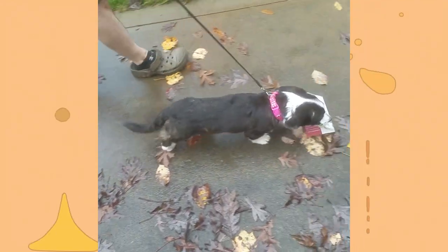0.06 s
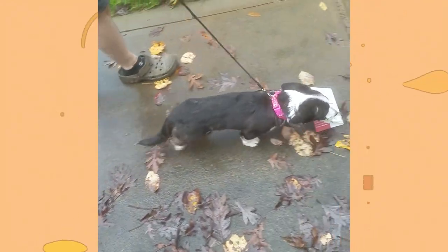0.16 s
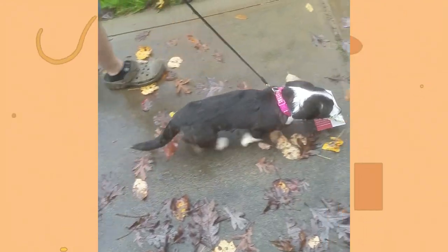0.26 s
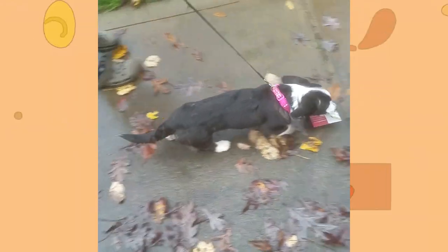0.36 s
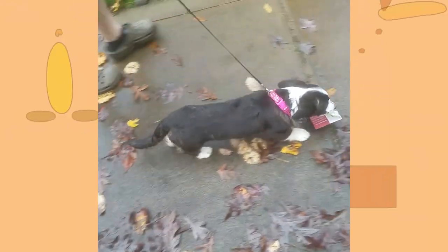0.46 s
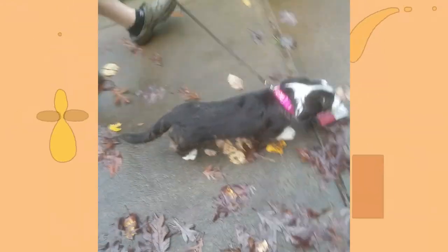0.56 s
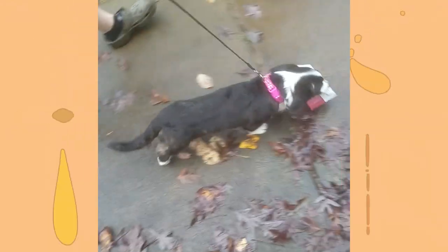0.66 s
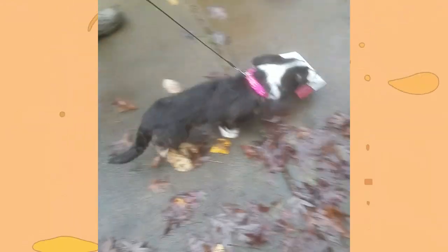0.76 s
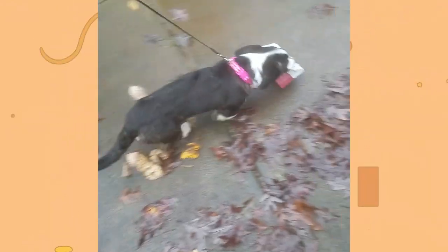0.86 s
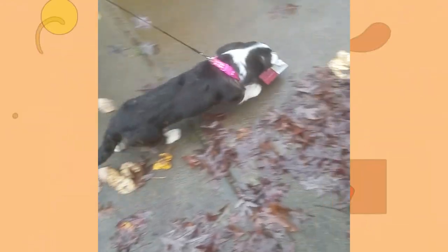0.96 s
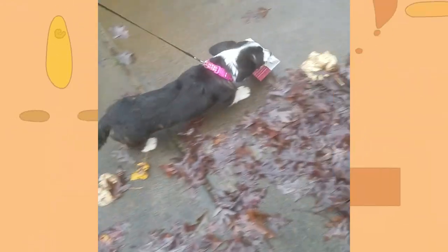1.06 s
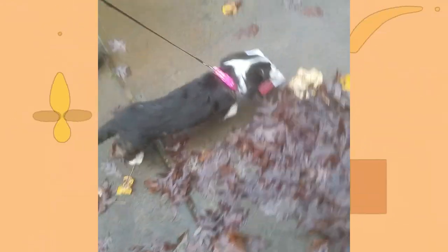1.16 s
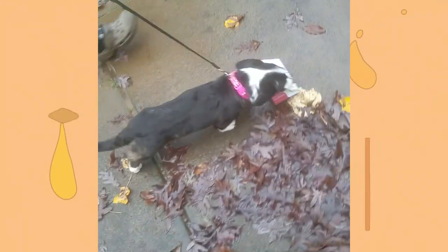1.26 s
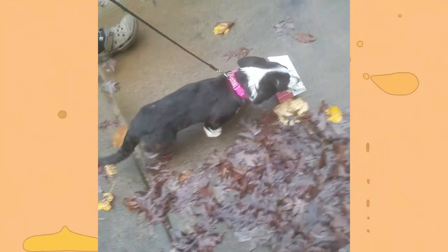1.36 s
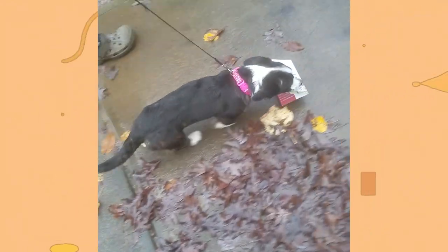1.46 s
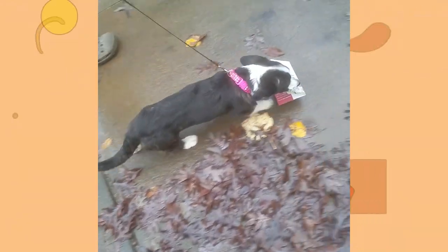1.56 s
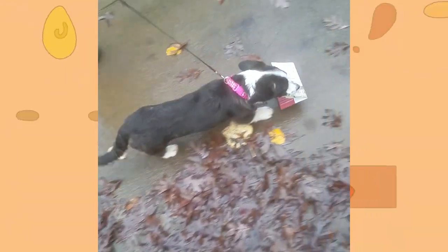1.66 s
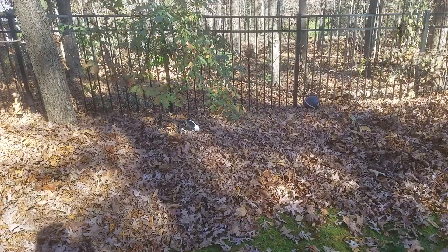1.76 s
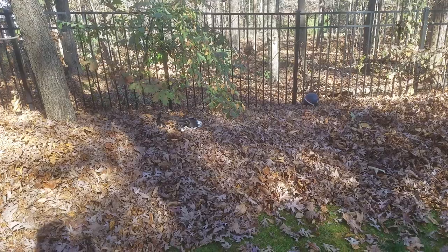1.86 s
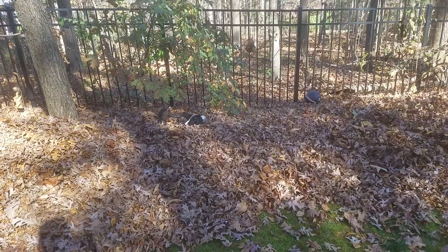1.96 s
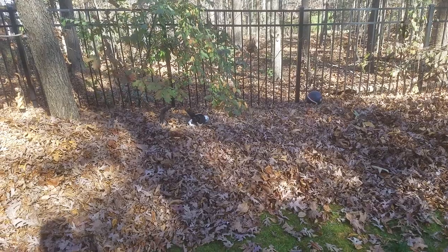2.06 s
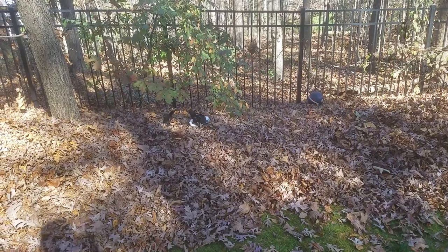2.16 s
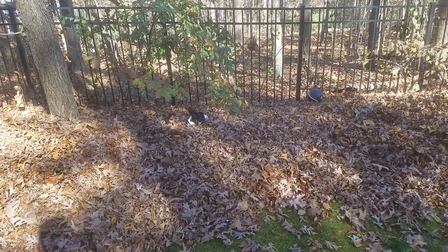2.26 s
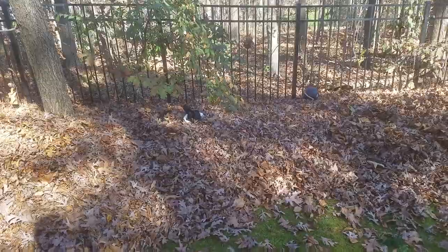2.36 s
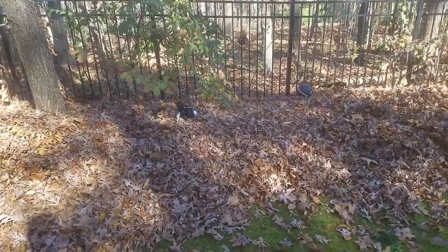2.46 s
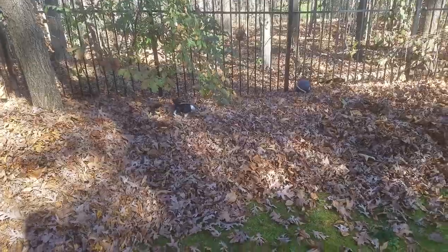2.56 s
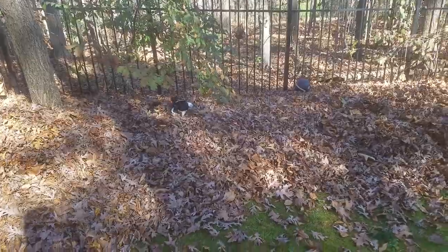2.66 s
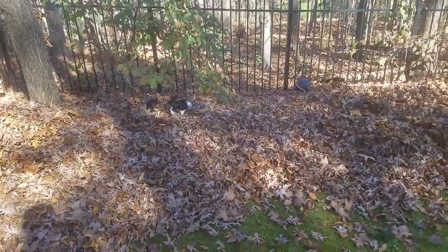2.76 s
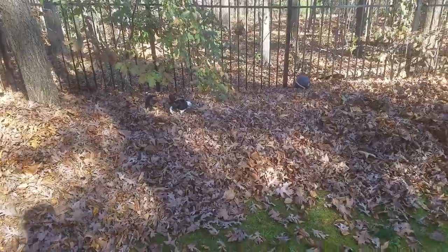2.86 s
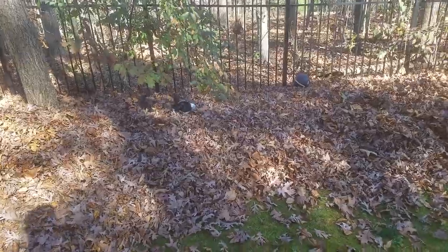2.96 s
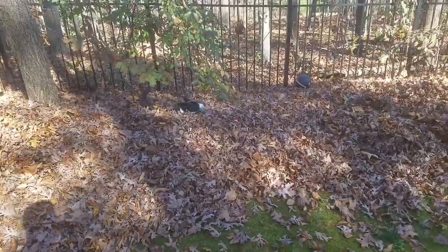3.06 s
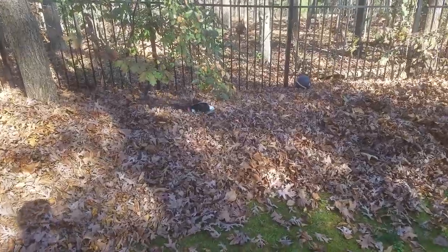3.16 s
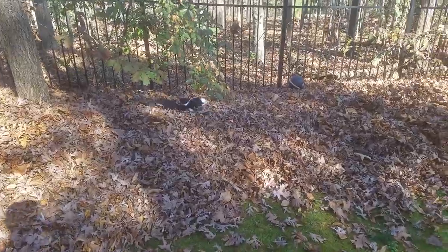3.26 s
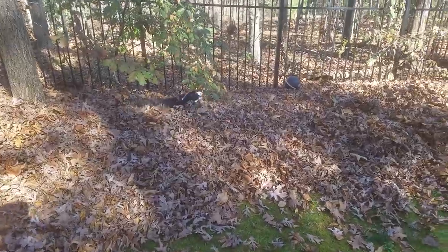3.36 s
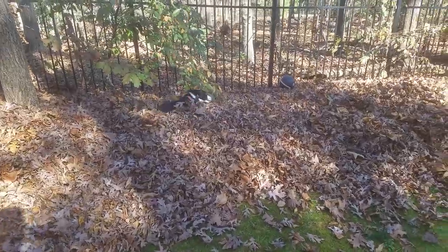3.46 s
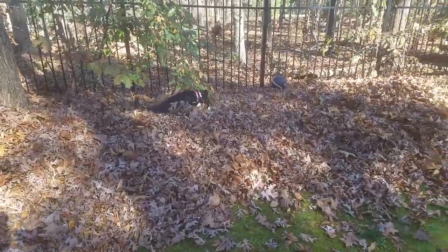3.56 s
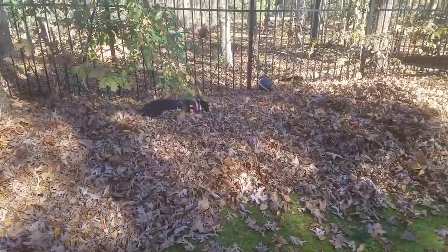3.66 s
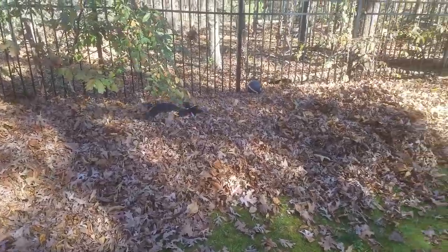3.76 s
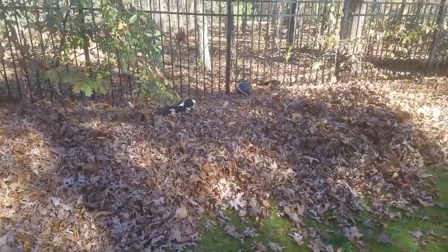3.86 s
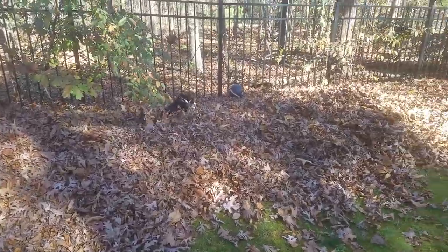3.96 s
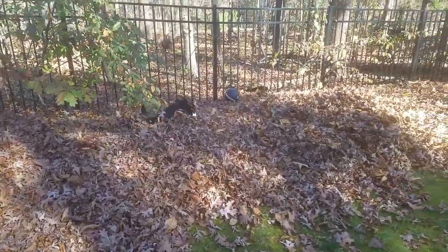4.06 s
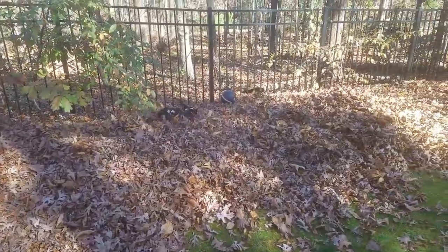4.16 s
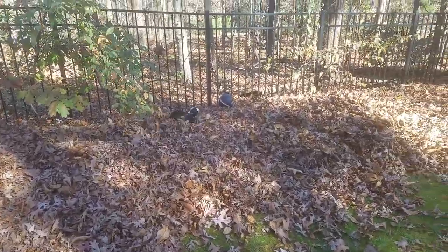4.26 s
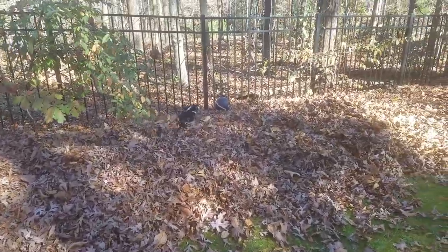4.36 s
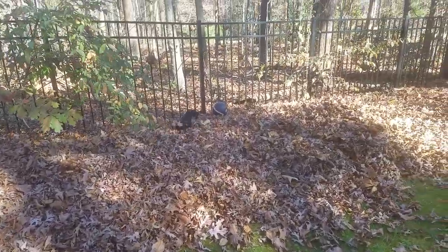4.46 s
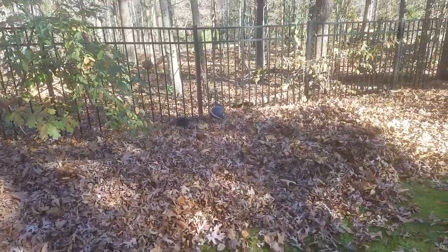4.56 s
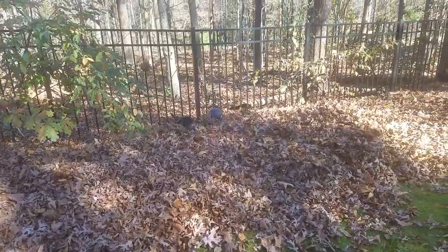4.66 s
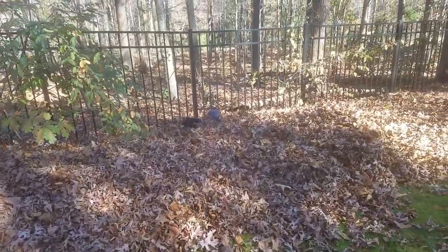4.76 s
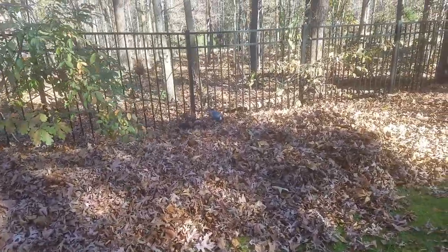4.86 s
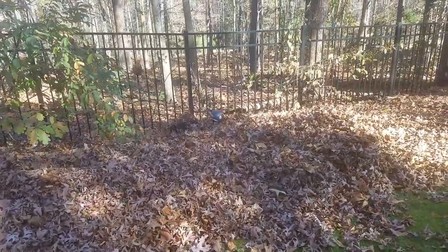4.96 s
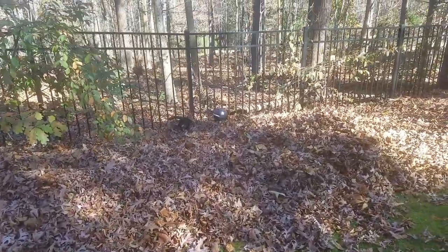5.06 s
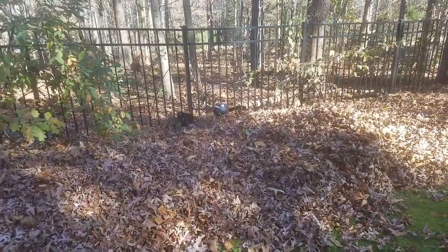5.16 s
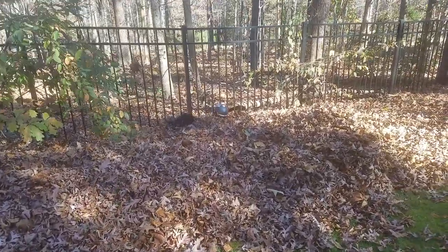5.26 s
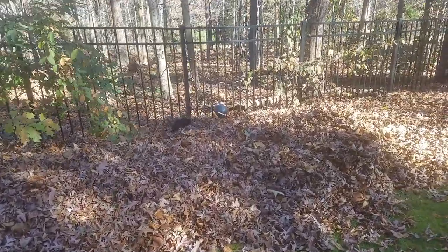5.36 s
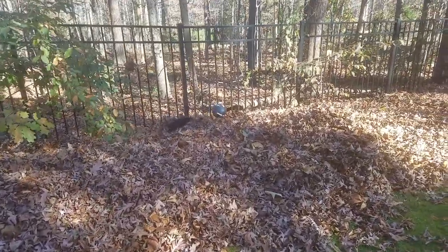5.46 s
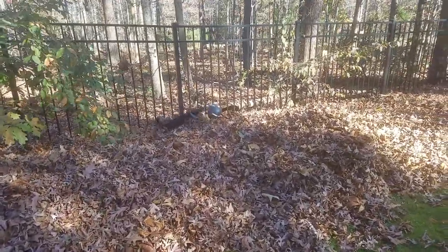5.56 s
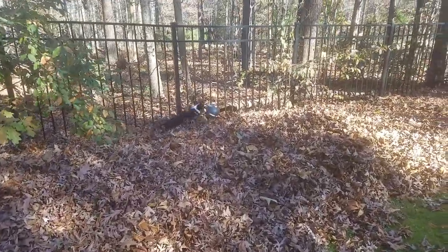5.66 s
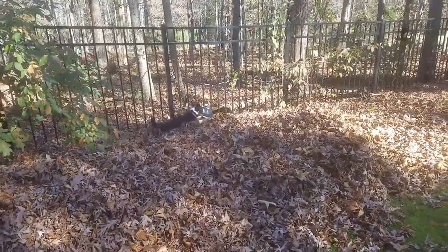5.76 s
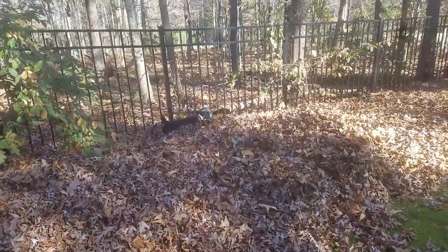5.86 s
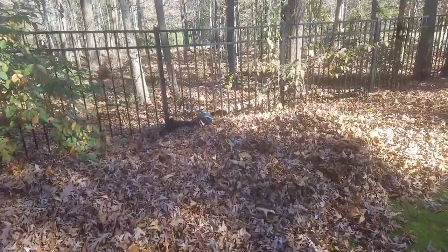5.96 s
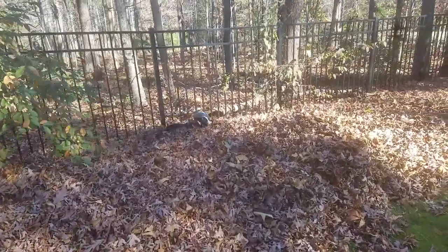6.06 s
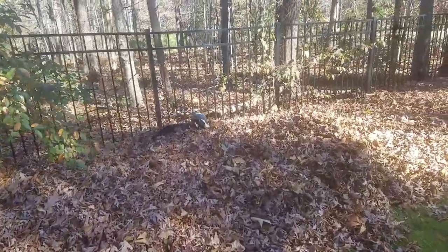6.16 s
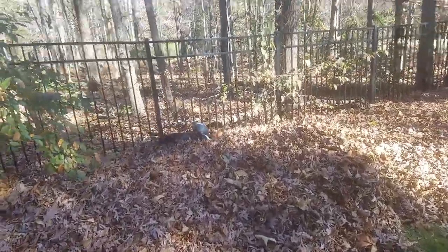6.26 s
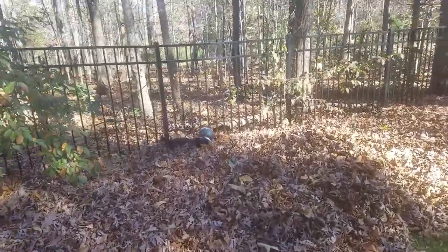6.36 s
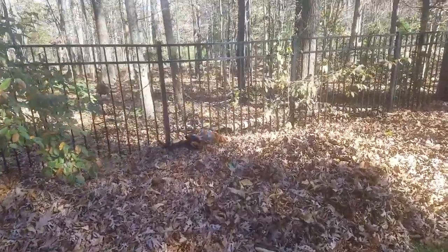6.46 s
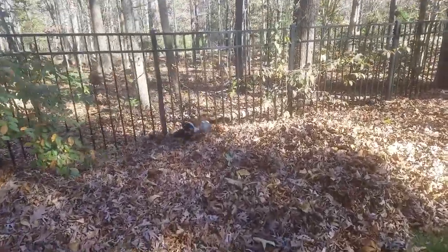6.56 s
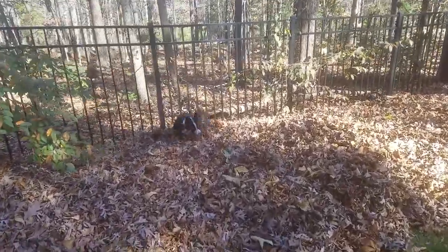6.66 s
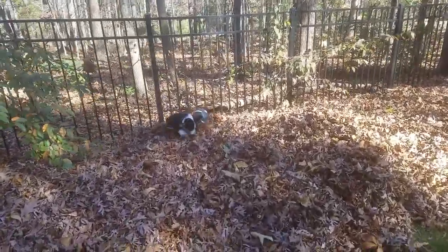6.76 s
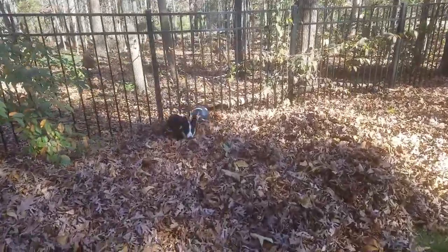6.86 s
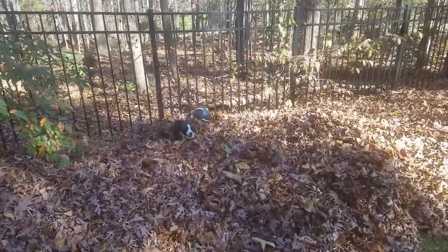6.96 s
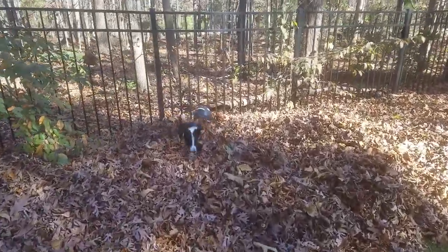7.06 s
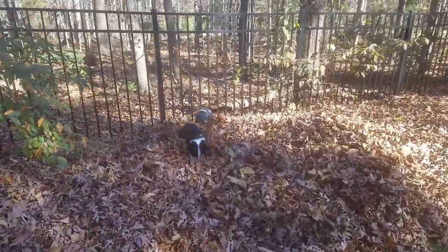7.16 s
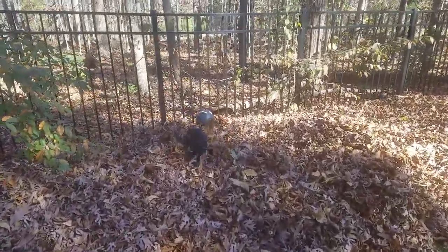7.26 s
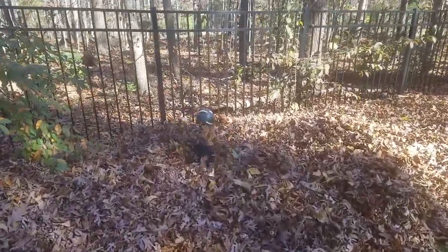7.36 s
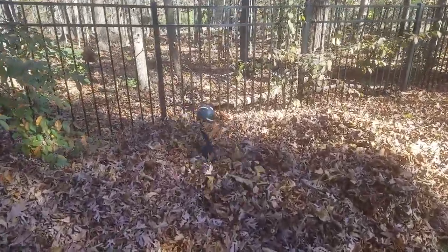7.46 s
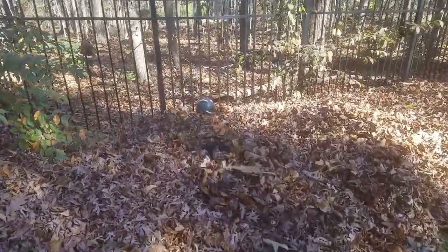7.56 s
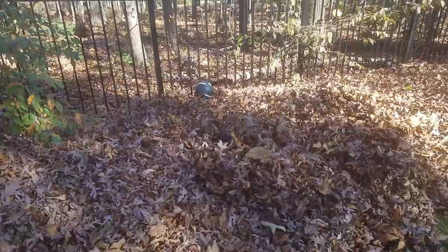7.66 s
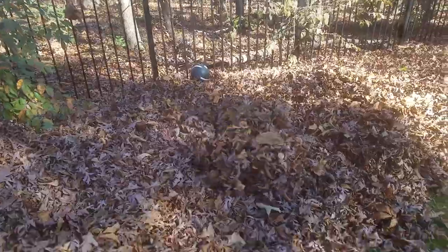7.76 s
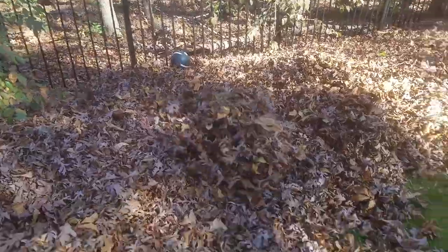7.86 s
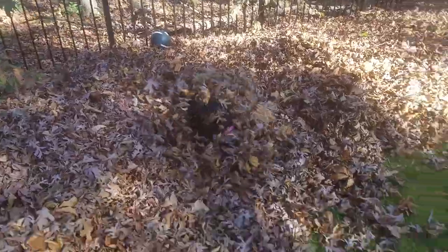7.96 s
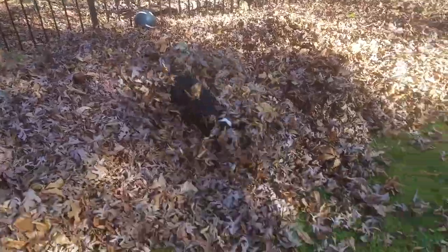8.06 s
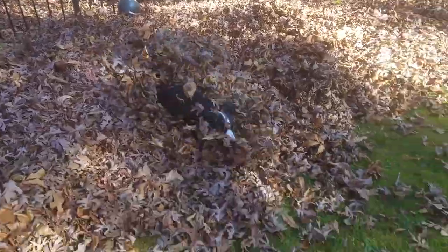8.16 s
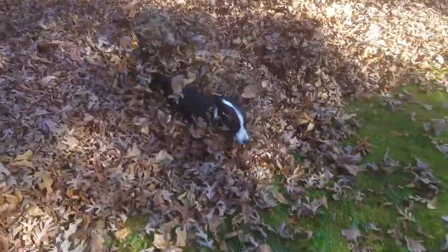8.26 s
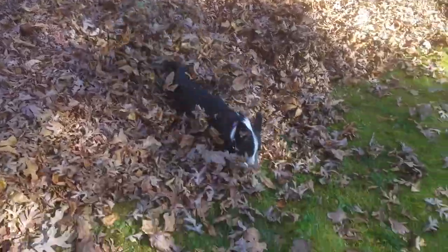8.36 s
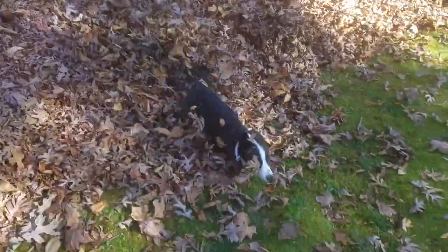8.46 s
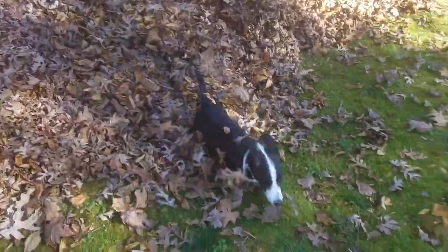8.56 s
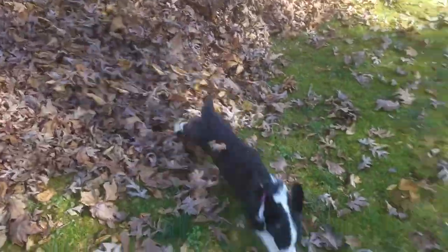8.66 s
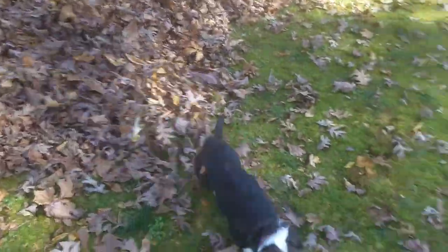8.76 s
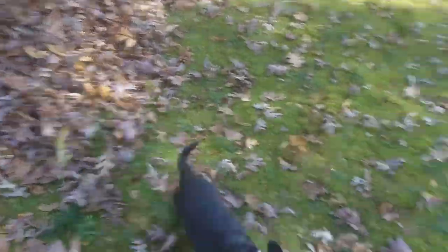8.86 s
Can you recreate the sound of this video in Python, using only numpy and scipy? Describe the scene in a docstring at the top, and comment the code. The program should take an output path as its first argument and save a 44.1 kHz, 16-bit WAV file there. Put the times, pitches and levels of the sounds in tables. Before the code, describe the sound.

A small dog pushes through a heap of dry leaves in a breezy yard, its brittle rustle coming in surges with occasional snaps and knocks of buried sticks. Before this comes a brief, quiet stretch of gritty shoe scuffs and sharp claw ticks on a pavement. The rustling starts some way off, eases briefly, then swells as the dog bounds close to the microphone and lands with dull thuds.

```python
"""Clogs scuff along a wet, leaf-strewn pavement, and grit clicks under the claws of a small dog beside them.
After 1.7 s the scene changes to a breezy yard: the dog ploughs through a deep pile of dry leaves,
then bounds closer, thudding as it lands. The scuffs are friction noise. The rustle is brittle fracture:
thousands of tiny cracks that reach two microphone ports, the left one first."""
import sys
import numpy as np
from scipy import signal
from scipy.fft import rfft, irfft, next_fast_len
from scipy.io import wavfile
from scipy.ndimage import uniform_filter1d, map_coordinates

SR = 44100
rng = np.random.default_rng(int(sys.argv[2]) if len(sys.argv) > 2 else 0)


def to_wav(sig):
    """Store sig (one row per channel, or 1-D mono) as 16-bit WAV at the path in sys.argv[1].

    Samples outside -1..1 are clipped; the rate is SR.
    """
    pcm = np.clip(np.atleast_2d(sig), -1, 1) * 32767
    pcm = np.round(pcm).astype(np.int16)
    wavfile.write(sys.argv[1], SR, pcm.T)  # frames by channels


N = 392931
TIME = np.arange(N) / SR
FFT_SIZE = next_fast_len(N + 8192)
FREQS = np.fft.rfftfreq(FFT_SIZE, 1 / SR)
YARD_START_S, TOP_HZ = 1.745, 16000
STREET_LEAD_MS = 0.24  # pavement sounds reach the right port first


def amp(db):
    """Amplitude ratio of a level in decibels."""
    return 10 ** (np.asarray(db) / 20)


def gain_at(points, hz):
    """Amplitude response from (f/Hz, level/dB) points, interpolated in log frequency."""
    f, db = np.transpose(points)
    return amp(np.interp(np.log(hz + 1), np.log(f + 1), db))


def curves(rows):
    """Linear interpolation in time: one value per sample for each column after the first."""
    times, *columns = np.transpose(rows)
    return [np.interp(TIME, times, column) for column in columns]


def wobble(rate):
    """Random modulation: a spline through rate Gaussian knots a second."""
    knots = rng.standard_normal(int(N * rate / SR) + 4)
    return map_coordinates(knots, [TIME * rate], order=2)


def filtered(x, response):
    """Linear filtering: the spectrum of x times a frequency response."""
    return irfft(rfft(x, FFT_SIZE) * response(FREQS), FFT_SIZE)[..., :N]


def gliding_band(x, centre_hz, width_hz):
    """Heterodyne band-pass: the part of x around a gliding centre frequency."""
    carrier = np.exp(2j * np.pi * np.cumsum(centre_hz) / SR)
    baseband = signal.lfilter(*signal.butter(1, width_hz / 2, fs=SR), x / carrier)
    return 2 * (carrier * baseband).real


def add(track, start, sound):
    """Superposition: a stereo sound joins the track at start seconds."""
    part = track[:, round(start * SR):][:, :sound.shape[-1]]
    part += sound[..., :part.shape[-1]]


# Imbalance of the ports in each place: f/Hz, left minus right level/dB
YARD_PORTS = [(60, -4), (110, -3), (200, -3), (380, -1.5), (700, 0), (1290, -1), (2380, -1.5), (4400, -2.5),
              (8120, 7.5), (15000, 3)]
STREET_PORTS = [(60, 1), (110, -1), (200, 0), (380, -3.5), (700, -2), (1290, -4), (2380, 1), (4400, -1),
                (8120, -1), (15000, -6.5)]

def coloured(pair, spectrum, band_hz, ports=YARD_PORTS):
    """Spectral shaping and port imbalance, scaled so that the channel mean has unit rms in the band."""
    tilt = np.sqrt(gain_at(ports, FREQS))
    shaped = rfft(pair, FFT_SIZE) * gain_at(spectrum, FREQS) * np.array([tilt, 1 / tilt])
    in_band = shaped.mean(axis=0)[(FREQS > band_hz[0]) & (FREQS < band_hz[1])]
    return irfft(shaped, FFT_SIZE)[:, :N] * np.sqrt(FFT_SIZE * N / 2) / np.linalg.norm(in_band)


def diffuse(spectrum, band_hz, coherence, ports=YARD_PORTS, lead_ms=0):
    """Diffuse field: partly coherent in the bass (right port lead_ms sooner), incoherent in the treble."""
    noise = rng.standard_normal((3, N))
    share = lambda hz: coherence / (1 + (hz / 1200) ** 4)
    delay = lambda hz: np.exp(1j * np.pi * hz * lead_ms / 1000 * np.array([[-1], [1]]))
    common = filtered(noise[0], lambda hz: np.sqrt(share(hz)) * delay(hz))
    separate = filtered(noise[1:], lambda hz: np.sqrt(1 - share(hz)))
    return coloured(common + separate, spectrum, band_hz, ports)


def crackle(count, spread_db, life_ms, left_lead_ms, spread_ms):
    """Shot noise: each tiny fracture is a damped cosine of random time, size, pitch, life and direction."""
    when, size, pitch, life, side = rng.uniform(1e-4, 1 - 1e-4, (5, count, 1))
    t = np.arange(40) / SR
    peak = amp(spread_db * np.minimum(-np.log(size), 5))
    decay = np.exp(-1000 * t / (life_ms * (0.5 + life)))
    grains = peak * np.cos(2 * np.pi * pitch * TOP_HZ * t) * decay
    lag = (left_lead_ms + spread_ms * np.log(side / (1 - side))) * SR / 1000
    starts = [np.abs(when * N + way * lag).astype(int) for way in (-0.5, 0.5)]
    return np.array([np.bincount((s + np.arange(len(t))).ravel(), grains.ravel(), N)[:N] for s in starts])


# Background spectrum of the street: f/Hz, relative spectral level/dB
STREET_SPECTRUM = [(25, -6), (70, 6), (150, 4), (400, 1.5), (800, -3), (1600, -6.5), (4000, -9),
                   (5500, -16.5), (8000, -18.5), (15500, -13)]

def street_air():
    """Stationary diffuse noise of a quiet residential street."""
    return amp(-69) * diffuse(STREET_SPECTRUM, (1000, 6000), coherence=0.9, ports=STREET_PORTS)


# Spectrum of wind in dry treetops: f/Hz, relative spectral level/dB
BREEZE_SPECTRUM = [(25, -26), (60, -11), (100, -7.5), (200, -3), (550, -0.5), (1000, 0), (1500, -3.5),
                   (2200, 1), (2900, 0.5), (4000, -3.5), (6000, -8.5), (8500, -18), (15500, -17)]
# Gaussian swells of the low rumble: centre t/s, half-width/s, level/dB
RUMBLE_SWELLS = [(1.873, 0.17, -59), (2.702, 0.32, -73), (4.814, 0.077, -61.5), (8.2, 0.46, -57.5),
                 (8.88, 0.088, -59)]

def yard_air():
    """Amplitude-modulated noise: a breeze stirs the treetops over a soft, uneven rumble."""
    breeze_gain = amp(-55 + 0.34 * wobble(6.8)) * amp([[-1], [0.8]])
    breeze = diffuse(BREEZE_SPECTRUM, (1000, 6000), coherence=0.66)
    rumble = diffuse([(25, -20), (65, 0), (110, -2), (200, -11.5), (500, -34.5)], (40, 150), coherence=0.41)
    swell = sum(amp(db) * np.exp(-0.5 * ((TIME - at) / half) ** 2) for at, half, db in RUMBLE_SWELLS)
    return breeze_gain * breeze + (amp(-70 + 0.5 * wobble(2.6)) + swell) * rumble


# Spectrum of ground grit: f/Hz, relative spectral level/dB
GRIT_SPECTRUM = [(300, 5), (600, 0.5), (1200, 3), (2500, -9), (4300, -9.5), (7000, -12.5), (9500, -18),
                 (12000, -12), (15500, -18)]
# Drags of soles and paws:
# t/s, duration/s, grit level/dB, treble lift/dB, rub level/dB, rasp f/Hz, rasp level/dB
DRAGS = [(0.138, 0.12, -68.5, 6, -64, 1490, -62), (0.249, 0.07, -57.5, 5, -67, 2400, -53.5),
         (0.298, 0.23, -78, 4, -62.5, 1160, -67), (0.675, .022, -66, -2, -85, 4260, -57),
         (0.71, 0.021, -58.5, 4, -80, 1850, -71), (0.792, .005, -70, 0, -71, 4200, -59),
         (0.811, 0.016, -68, 13, -78, 4350, -57), (0.985, .026, -60, 6, -72, 4600, -72),
         (1.04, 0.025, -56, 1, -56.5, 634, -55), (1.063, 0.13, -71, 8, -72, 1400, -74),
         (1.233, 0.064, -63.5, -1, -66, 4080, -66), (1.354, 0.025, -74, 5, -80, 4600, -78),
         (1.521, 0.049, -65, 2, -68, 2090, -60), (1.61, 0.035, -53.5, -12, -62, 1250, -63)]

def scuffs():
    """Sliding friction: each drag grinds grit and wet leaves over a dull rub, and rasps at its own pitch."""
    grain = dict(life_ms=0.15, left_lead_ms=-STREET_LEAD_MS, spread_ms=0.05)
    grains = crackle(count=90000, spread_db=3, **grain) * amp(2.4 * wobble(160))
    grit = coloured(grains, GRIT_SPECTRUM, (1500, 15000), STREET_PORTS)
    grit = filtered(grit, lambda hz: hz ** 2 / (hz ** 2 + 1100 ** 2))
    treble = filtered(grit, lambda hz: 1 - 1 / (1 + (hz / 9000) ** 8))
    rub_spectrum = [(100, -22), (300, 2), (600, 7), (1200, -2.5), (2200, 0.5), (6000, -32)]
    rub = diffuse(rub_spectrum, (300, 1500), coherence=0.7, ports=STREET_PORTS, lead_ms=STREET_LEAD_MS)
    out, on = np.zeros((2, N)), slice(0, round(YARD_START_S * SR))
    for start, length, grit_db, treble_db, rub_db, rasp_hz, rasp_db in DRAGS:
        stroke = 1 / (1 + np.abs(2 * (TIME[on] - start) / length - 1) ** 4.3)
        grind = amp(grit_db) * (grit[:, on] + (amp(treble_db) - 1) * treble[:, on])
        rasp = signal.lfilter(*signal.iirpeak(rasp_hz, Q=1 / 0.19, fs=SR), grains[:, on])
        rasp = amp(rasp_db) * rasp / rasp.std() * amp([[-1], [1.5]])
        out[:, on] += stroke * (grind + amp(rub_db) * rub[:, on] + rasp)
    stray_grains = crackle(count=260, spread_db=3.2, **grain)
    return out + amp(-74.5) * grit + amp(-63) * stray_grains


# Grit clicking under a sole or claw: t/s, level/dB, f/Hz
GRIT_CLICKS = [(.451, -43, 9000), (0.4995, -26, 13000), (.568, -42, 13000), (.978, -35, 8000),
               (1.083, -39, 13000), (1.115, -39, 12000), (1.154, -39, 12000), (1.215, -42, 2500),
               (1.288, -25.5, 12500), (1.382, -42, 7000)]

def grit_clicks():
    """Hard impact: a heavily damped oscillation, at the right port first, with a trace of scatter."""
    out, t = np.zeros((2, N)), np.arange(SR // 50) / SR
    for start, db, hz in GRIT_CLICKS:
        right = np.cos(2 * np.pi * hz * t) * np.exp(-t / 0.00015)
        left = amp(-6.5) * np.roll(right, round(STREET_LEAD_MS * SR / 1000))
        scatter = rng.standard_normal((2, len(t))) * amp(-17 - 60 * t / 0.0099)
        add(out, start, amp(db) * (np.array([left, right]) + scatter))
    return out


# Dull taps of soles and buried sticks: t/s, level/dB, f/Hz, T60/s
DULL_TAPS = [(.012, -43.5, 1640, 0.01), (0.3308, -34, 1020, 0.0081), (1.63, -30.5, 664, 0.0076),
             (1.63, -42, 157, 0.0305), (5.1377, -29, 1420, 0.0086), (5.214, -30.5, 856, 0.01),
             (5.278, -33.5, 981, 0.01303), (5.3483, -20.5, 1300, 0.0056), (5.407, -28, 1170, 0.0083),
             (5.688, -37, 1276, 0.015)]

def taps():
    """Modal ringing: a soft contact excites two modes for a few cycles over a small crack."""
    out, t = np.zeros((2, N)), np.arange(SR // 10) / SR
    for start, db, hz, t60 in DULL_TAPS:
        modes = np.sin(2 * np.pi * hz * t) + 0.5 * np.sin(2 * np.pi * 1.32 * hz * t)
        onset = (1 - np.exp(-3 * hz * t)) ** 2
        crack = 0.16 * rng.standard_normal((2, len(t))) * amp(-60 * t / 0.01196)
        add(out, start, amp(db - 60 * t / t60) * (1.47 * onset * modes + crack))
    return out


# Leaves and stalks snapping: t/s, level before filtering/dB, relative treble level/dB, T60/s
LEAF_SNAPS = [(0.269, -42, -7, .02), (.6724, -45, 0, .024), (.703, -35, -6, .012), (.7935, -43, -7, .008),
              (.8129, -43, 5, .008), (0.973, -43, 1, .01), (1.0015, -46, 9, 0.015), (1.042, -51, -5, .02),
              (1.053, -44, -2, .025), (1.1273, -43.5, 1, 0.014), (1.3497, -43.5, -1, .012),
              (1.5033, -43, -2, 0.013), (2.821, -32, -7, 0.012), (2.9542, -24.5, -17, 0.026),
              (2.964, -26.5, 5, 0.01), (3.009, -35, 9, .008), (5.5087, -21.5, -1, 0.005),
              (5.9837, -27.5, -22, .03), (6.938, -20, -2.5, .008), (7.7638, -20, -3, 0.03),
              (8.076, -16, -9, 0.018), (8.884, -25, -3, 0.021)]

def snaps():
    """Brittle fracture: a stiff leaf gives way in a noise burst that dies at once."""
    body, edge = np.zeros((2, 2, N))
    t = np.arange(SR // 10) / SR
    for start, db, treble_db, t60 in LEAF_SNAPS:
        tearing = 1 - np.exp(-t / (0.086 * t60))  # the longer the tear, the slower it builds
        burst = np.clip(rng.standard_normal((2, len(t))), -1.7, 1.7) * tearing * amp(db - 60 * t / t60)
        side_db = -3 if start < YARD_START_S else 1.5  # pavement to the right, pile to the left
        add(body, start, burst * amp([[side_db / 2], [-side_db / 2]]))
        add(edge, start, burst * amp([[treble_db + side_db], [treble_db - side_db]]))
    body_spectrum = [(200, -34), (1000, 2.5), (3500, 10), (7000, -7), (15000, -28.5)]
    edge_spectrum = [(2000, -40), (6000, 2.5), (9500, -0.5), (14000, 2)]
    return (filtered(body, lambda hz: gain_at(body_spectrum, hz))
            + filtered(edge, lambda hz: gain_at(edge_spectrum, hz)))


# Paws landing through the leaves: t/s, level/dB
PAW_LANDINGS = [(7.87, -48), (8.045, -50), (8.17, -42), (8.335, -48.5), (8.49, -51)]

def thuds(crunch_db, near):
    """Damped impact: the dog's weight on packed leaves and soil, louder with effort and nearness."""
    spectrum = [(25, -16), (60, -14), (110, -4.5), (170, -4.5), (280, 1), (450, -6), (900, -9.5)]
    thud = diffuse(spectrum, (60, 400), coherence=0.68)
    envelope = near ** 3 * amp(-44 + 0.63 * (crunch_db - crunch_db.max()) + 0.53 * wobble(22))
    for start, db in PAW_LANDINGS:
        age = np.clip((TIME - start) / 0.01, 0, 20)  # each landing peaks after 10 ms
        envelope = np.hypot(envelope, amp(db) * age * np.exp(1 - age))
    return envelope * thud


# Reflection from a hand beside the ports: t/s, left delay/ms, right delay/ms
HAND_DELAYS = [(3.3, 1.37, 0.95), (4.4, 1.48, 1.17), (6, 1.37, 1.15), (7, 1.9, 1.05), (7.6, 1.55, 1.22),
               (8.2, 1.4, 0.82), (8.9, 1.04, 0.78)]

def reflections(pair, hand_gain, count, surface_gain, drift_ms):
    """Comb filtering: nearby surfaces add weak early copies whose delays drift as dog and listener move."""
    n = np.arange(N)
    delayed = lambda x, ms: np.interp(n - ms * SR / 1000, n, x)
    out = pair + hand_gain * np.array([delayed(x, ms) for x, ms in zip(pair, curves(HAND_DELAYS))])
    for ms in np.linspace(2.3, 5.5, count):
        drift = drift_ms * np.interp(n, np.linspace(0, N, 14), rng.standard_normal(14))
        out += surface_gain * rng.choice([-1, 1]) * np.array([delayed(x, ms + drift) for x in pair])
    return out


# Gliding peaks in the rustle's spectrum: t/s, f/Hz, gain/dB
LOW_PEAK = [(2.9, 2860, 7), (3.85, 2783, 6), (4.3, 2940, 8), (4.9, 2990, 2.5), (6.3, 2980, 5),
            (6.8, 2900, 6.5), (7.2, 2950, 1), (7.6, 2420, 1), (8.8, 2730, 4)]
MID_PEAK = [(3, 3750, 2.8), (3.6, 3700, 5.5), (4, 3300, 3), (4.6, 3470, 5.2), (5.7, 3417, 2.5),
            (6.4, 3300, 1.1), (7.45, 3400, 1.5), (8.6, 3100, 0.91)]
HIGH_PEAK = [(3.3, 4660, 4), (3.55, 4450, 5), (3.8, 4200, 2.5), (4.2, 4270, 5), (4.95, 3960, 2.5),
             (5.8, 4300, 2), (6.75, 4390, 7), (7.05, 4750, 7), (7.45, 4150, 0.5), (8.7, 4300, -2)]
TOP_PEAK = [(3.5, 6600, 2.9), (3.9, 6170, 1.4), (5.8, 6170, 1.8), (6.7, 6550, 2.7), (7.5, 6150, 1)]
# Notches that at times rise into peaks: t/s, f/Hz, gain/dB
LOW_NOTCH = [(3.3, 1280, -2), (4.2, 1120, -12), (4.7, 1110, -24), (5.2, 1110, -3), (6.8, 1220, -8),
             (7.3, 1560, -5), (8.3, 1780, 4)]
MID_NOTCH = [(3, 2450, 5), (4, 2520, -2), (5.6, 2300, -0.5), (7, 2370, 3), (8.6, 1890, -8)]
HIGH_NOTCH = [(3.2, 4100, -1), (3.9, 3917, -4), (4.2, 3660, -8), (6.9, 4050, 5), (7.4, 3550, -3)]

def peaks_and_notches(rustle):
    """Time-varying filtering: gliding peaks and notches colour the rustle, as drifting short echoes do."""
    peaks, notches = (LOW_PEAK, MID_PEAK, HIGH_PEAK, TOP_PEAK), (LOW_NOTCH, MID_NOTCH, HIGH_NOTCH)
    for tracks, width_hz in [(peaks, 115), (notches, 130)]:
        for track in tracks:
            hz, db = curves(track)
            rustle = rustle + (amp(db) - 1) * gliding_band(rustle, hz, width_hz)
    return rustle


def clumps(rustle, depth_db):
    """Spectral fluctuation: each clump of leaves favours its own bands for a few hundredths of a second."""
    frames = signal.stft(rustle, nperseg=512)[2]
    patches = uniform_filter1d(rng.standard_normal(frames.shape[1:]), size=4, axis=0)
    patches = uniform_filter1d(patches, size=10, axis=1)
    rolloff = 1 / (1 + (np.linspace(0, SR / 2, len(patches)) / 6000) ** 4)
    gain = amp(depth_db * rolloff[:, None] * patches / patches.std())
    return signal.istft(frames * gain, nperseg=512)[1][:, :N]


# Single strokes through the leaves: centre t/s, half-width/s, level/dB, f/Hz
LEAF_STROKES = [(2.14, 0.04, -61, 5600), (2, 0.16, -61, 2460), (5.2, 0.19, -54, 1700),
                (7.45, 0.097, -44, 1920)]

def strokes(rustle):
    """Band-limited noise under a Gaussian envelope: a paw or the nose sweeps one patch of leaves."""
    out = np.zeros((2, N))
    for at, half, db, hz in LEAF_STROKES:
        band = signal.butter(1, [hz / 1.17, hz * 1.17], "bandpass", fs=SR, output="sos")
        patch = signal.sosfilt(band.repeat(2, axis=0), rustle)
        out += amp(db) * np.exp(-0.5 * ((TIME - at) / half) ** 2) * patch / patch.std()
    return out


# The dog's steady wading: t/s, crunch level/dB, treble lift/dB
DOG_WADING = [(2.75, -56.5, 2), (2.92, -49, 1), (3.1, -46, 4), (3.33, -45, 3.5), (3.6, -44.5, 5.5),
              (4.6, -43, 4), (5.15, -44.5, 3.5), (5.45, -50.5, 5), (6.05, -54, 4), (6.62, -51, 7),
              (6.8, -47, 1), (7.15, -42, 6.5), (7.33, -38.5, 2), (7.6, -36, 1.5), (8.1, -36.5, 8),
              (8.48, -34, 2), (8.51, -39, 7.5), (8.72, -42, 4), (8.91, -49, 5)]
# Its lunges and bounds: t/s, duration/s, crunch level/dB, treble lift/dB
DOG_LUNGES = [(3.146, 0.12, -43, -2), (3.525, 0.12, -40, 1.5), (3.66, 0.17, -42.5, -6),
              (3.97, 0.22, -46, 4.5), (4.13, 0.17, -43, 1.5), (4.39, 0.12, -43.5, 4),
              (4.564, 0.23, -44.5, 4), (5.724, 0.25, -48, 3), (6.109, 0.12, -47, 2), (6.278, 0.13, -45, 4),
              (6.444, 0.12, -49, 8.5), (6.688, 0.22, -43.5, 6.5), (6.958, 0.087, -43, 7.5),
              (7.216, 0.11, -41, -2), (7.429, 0.089, -34.5, 5), (7.643, 0.13, -40, 12),
              (7.682, 0.012, -33, 6), (7.763, 0.02, -31, 5.5), (7.785, 0.062, -36.5, 9),
              (7.888, 0.098, -36.5, 6), (7.918, 0.05, -33.5, -2), (8.065, 0.079, -33, -4),
              (8.164, 0.025, -29.5, -6), (8.278, 0.056, -38, 10.5), (8.348, 0.058, -32, 8),
              (8.451, 0.024, -32.5, 0), (8.603, 0.035, -39.5, 6), (8.641, 0.026, -36.5, 13),
              (8.7, 0.013, -38, -3)]

def effort(attack_s=0.011, release_s=0.013):
    """Incoherent sources add in power: lunges over wading give the crunch and treble levels in dB."""
    wading_db, lift_db = curves(DOG_WADING)
    crunch_power, treble_power = amp(wading_db) ** 2, amp(wading_db + lift_db) ** 2
    for start, length, db, lunge_lift_db in DOG_LUNGES:
        ease = min(length / 0.082, 1)  # lunges under 82 ms are more sudden in proportion
        rise = (1 + np.tanh((TIME - start) / (2 * ease * attack_s))) / 2
        fall = (1 + np.tanh((start + length - TIME) / (2 * ease * release_s))) / 2
        crunch_power += rise * fall * amp(db) ** 2
        treble_power += rise * fall * amp(db + lunge_lift_db) ** 2
    uneven_db = 0.26 * wobble(18)  # leaves never give way evenly
    return 10 * np.log10([crunch_power, treble_power]) + uneven_db


# Leaves from afar and from close by: f/Hz, relative spectral level/dB
FAR_SPECTRUM = [(60, -22.5), (130, -21), (170, -13.5), (290, -8), (420, -6.5), (510, -5), (610, 0.7),
                (780, -1), (1150, 4), (1500, 2.5), (2300, 1), (2900, -1), (4300, -5), (5400, -8.5),
                (6400, -8.5), (7000, -14.5), (8500, -17), (15500, -17)]
NEAR_SPECTRUM = [(60, -26), (160, -8), (280, -3.5), (440, -8.5), (640, 2.8), (1200, 5), (2900, 1.5),
                 (4300, -1), (5400, -7), (6400, -8), (7000, -15.5), (7700, -16), (9500, -20.5),
                 (12500, -14.5), (15500, -18)]
# Hollow, gliding tone in the low swish of the leaves: t/s, f/Hz, gain/dB
HOLLOW_TONE = [(2.8, 850, 5), (4.7, 774, 5), (5.3, 900, 0), (6.1, 440, 5.5), (6.8, 520, 5.5),
               (7.25, 930, 1), (8.3, 1340, 5.5), (8.9, 1300, 5)]
# Swish of the leaf mass shoved aside: t/s, gain relative to the crunch/dB
PILE_SWISH = [(2.8, 1), (4.3, 0), (5.4, -1), (6.7, -1.5), (7.4, 1), (8.4, -6.5), (8.6, -6.5), (8.9, -6.5)]

def leaf_pile(crunch_db, treble_db, near):
    """Superposed fractures: leaves crunch, the moving mass swishes below, fast strokes add crisp treble."""
    cracks = crackle(count=80000, spread_db=2, life_ms=0.085, left_lead_ms=0.24, spread_ms=0.017)
    cracks *= amp(0.92 * wobble(45) + 0.7 * wobble(220))
    # the rest of the pile scatters the higher notes in all directions
    scatter = filtered(rng.standard_normal((2, N)), lambda hz: hz ** 3 / (hz ** 3 + 1750 ** 3))
    rustle = cracks / cracks.std() + amp(5.5) * scatter
    rustle = reflections(rustle, hand_gain=0.15, count=3, surface_gain=0.064, drift_ms=0.11)
    rustle = clumps(peaks_and_notches(rustle), depth_db=1.5)
    leaves = (np.sqrt(1 - near) * coloured(rustle, FAR_SPECTRUM, (1500, 6000))
              + np.sqrt(near) * coloured(rustle, NEAR_SPECTRUM, (1500, 6000)))
    low = filtered(leaves, lambda hz: 1 / (1 + (hz / 1350) ** 6))
    high = filtered(leaves, lambda hz: 1 - 1 / (1 + (hz / 6500) ** 8))
    hollow_hz, hollow_db = curves(HOLLOW_TONE)
    hollow = (amp(hollow_db) - 1) * gliding_band(low, hollow_hz, width_hz=240)
    swish = amp(crunch_db + curves(PILE_SWISH)[0]) * (low + hollow)
    crunch = amp(crunch_db) * (leaves - low - high)
    crisp = amp(treble_db) * high
    wading_in = np.clip((TIME - 2.7) / 0.23, 0, 1)
    return strokes(rustle) + wading_in * (swish + crunch + crisp)


# The dog's approach: t/s, nearness (0 far, 1 close)
APPROACH = [(6.7, 0.06), (7.2, 0.72), (7.5, 0.93), (8.2, 0.95)]

def scene():
    """Superposition of the sources: the pavement, then, after a brief gap, the scene changes to the yard."""
    crunch_db, treble_db = effort()
    near = curves(APPROACH)[0]
    street_end_s = YARD_START_S - 0.005
    street = (TIME < street_end_s) * (scuffs() + grit_clicks() + street_air())
    fade_in = np.clip((TIME - street_end_s) / 0.014, 0, 1) ** 4
    yard = fade_in * (yard_air() + leaf_pile(crunch_db, treble_db, near) + thuds(crunch_db, near))
    return street + yard + snaps() + taps()


def record(dry):
    """Band limiting: an ideal low-pass removes everything above TOP_HZ."""
    return filtered(dry, lambda hz: hz < TOP_HZ)


dry = scene()
out = record(dry)
to_wav(out)
```